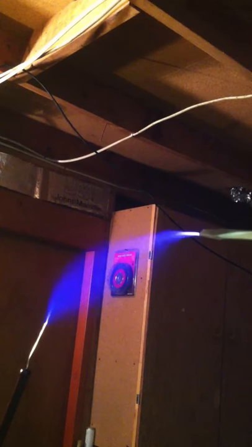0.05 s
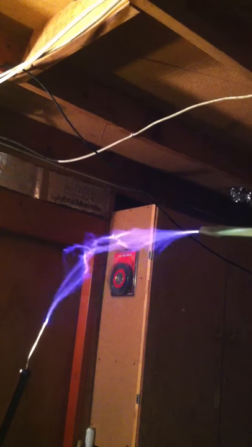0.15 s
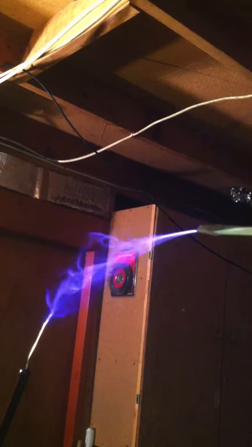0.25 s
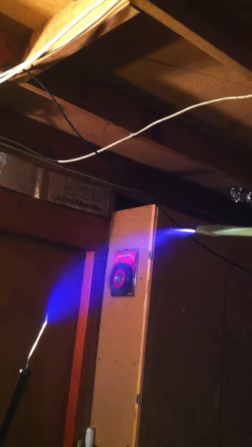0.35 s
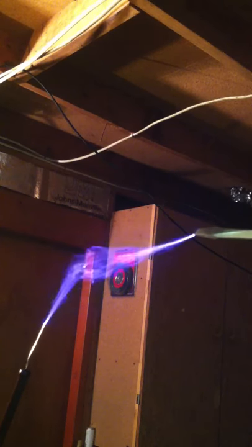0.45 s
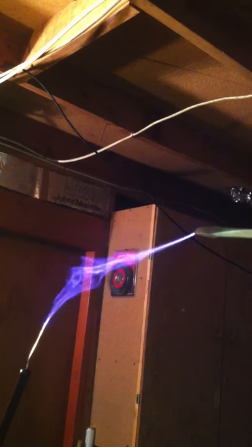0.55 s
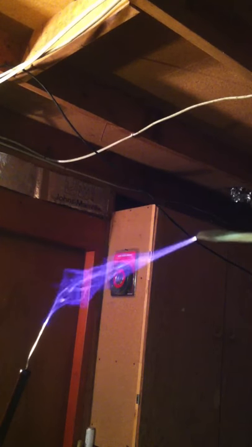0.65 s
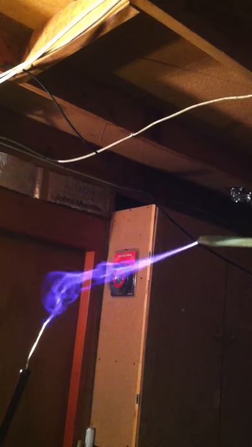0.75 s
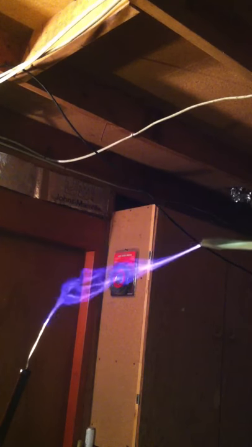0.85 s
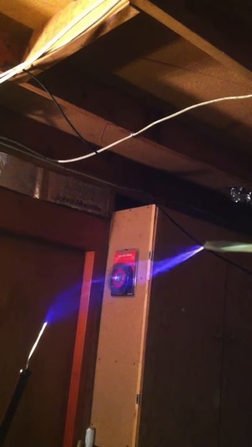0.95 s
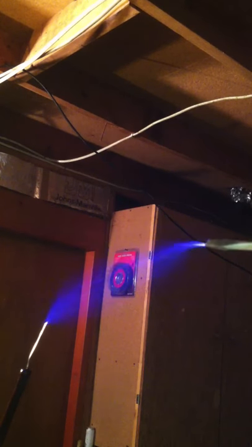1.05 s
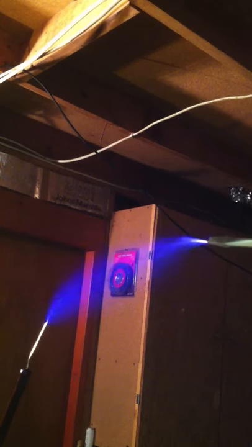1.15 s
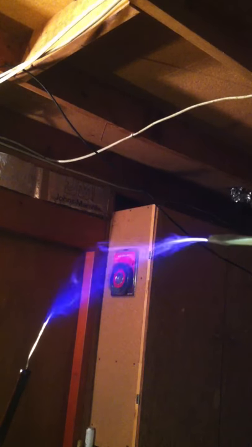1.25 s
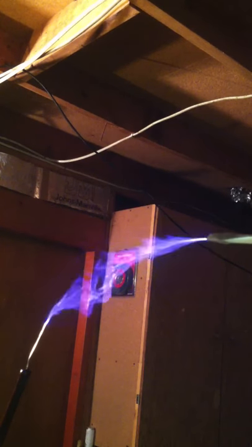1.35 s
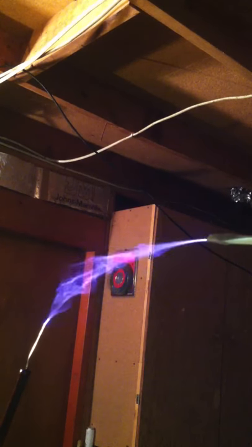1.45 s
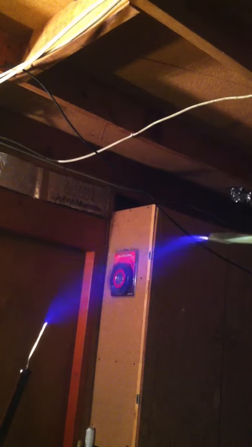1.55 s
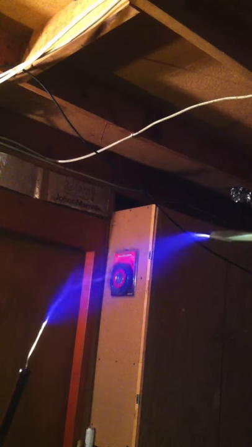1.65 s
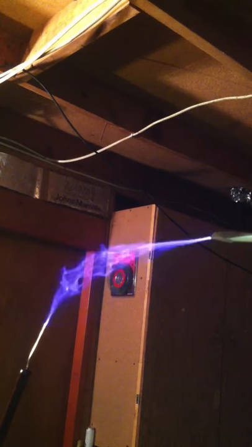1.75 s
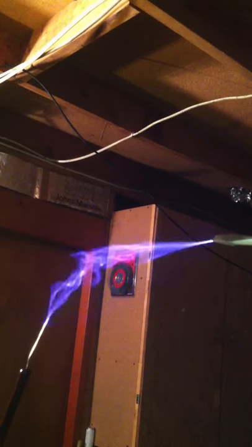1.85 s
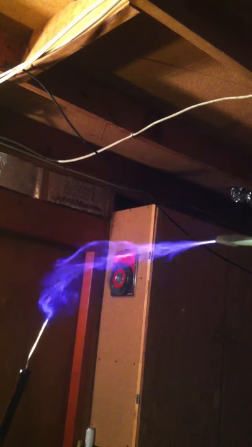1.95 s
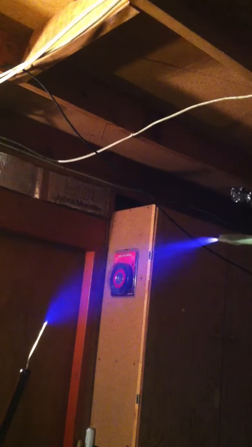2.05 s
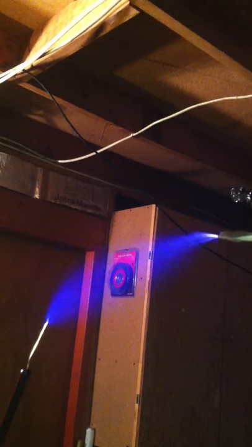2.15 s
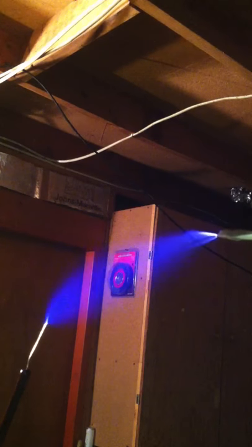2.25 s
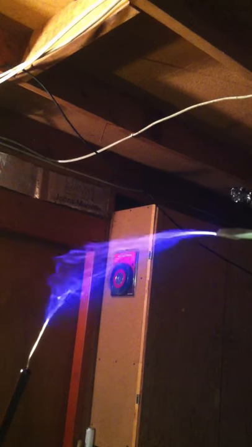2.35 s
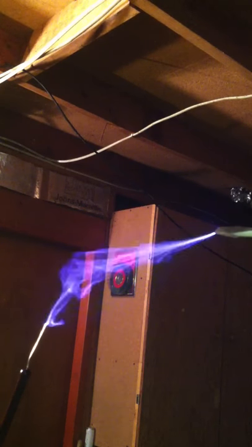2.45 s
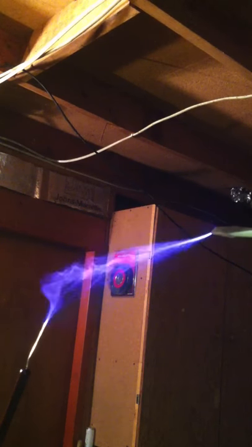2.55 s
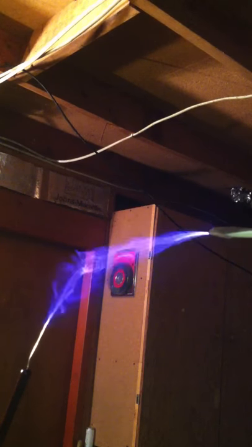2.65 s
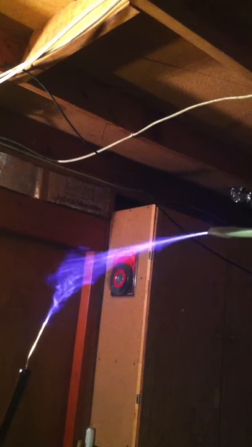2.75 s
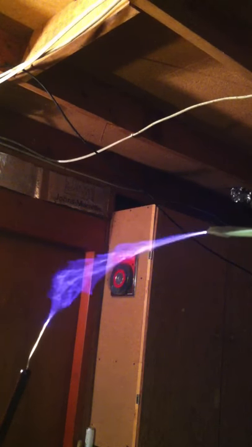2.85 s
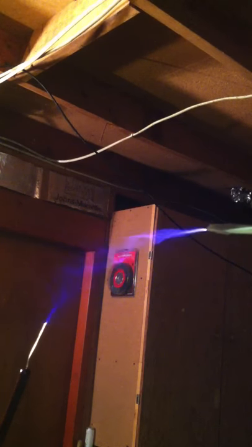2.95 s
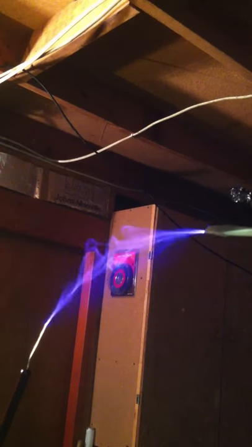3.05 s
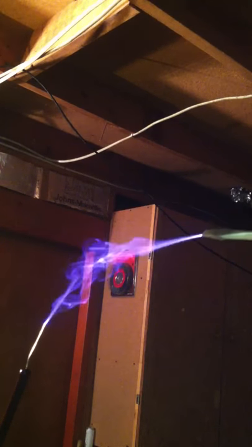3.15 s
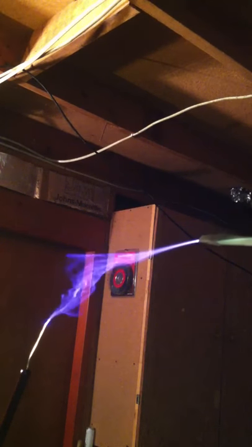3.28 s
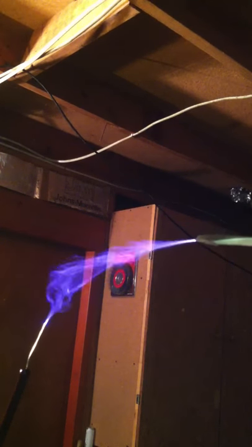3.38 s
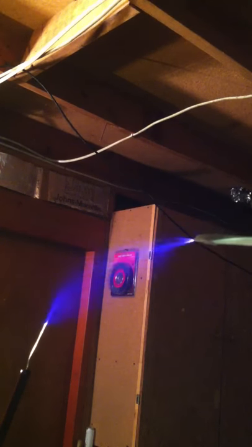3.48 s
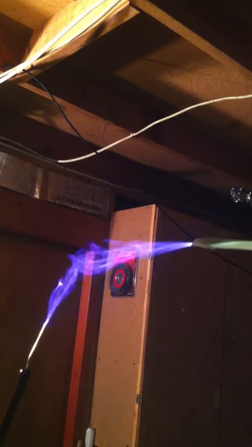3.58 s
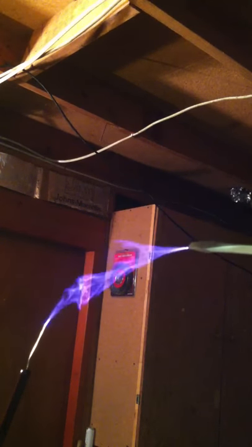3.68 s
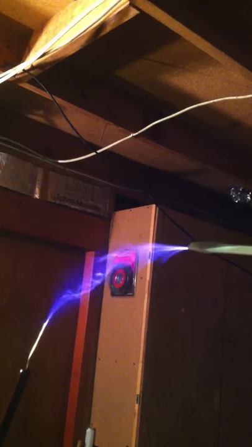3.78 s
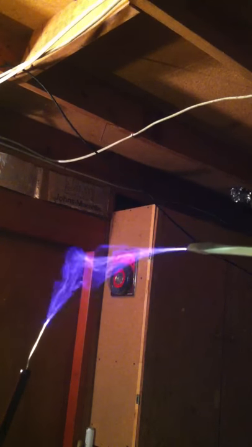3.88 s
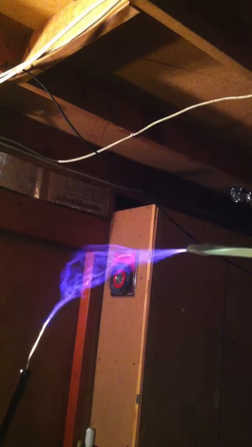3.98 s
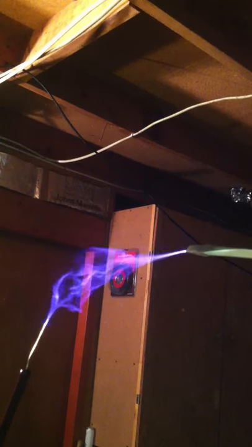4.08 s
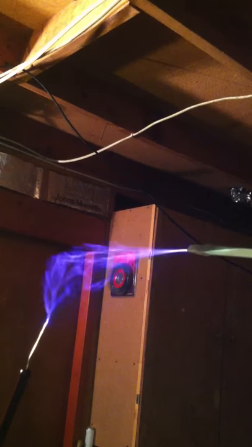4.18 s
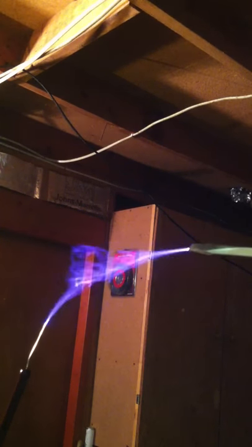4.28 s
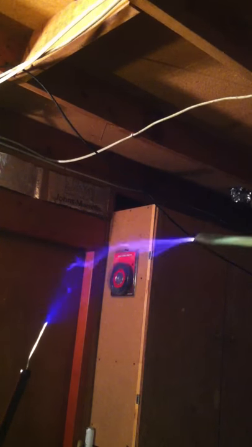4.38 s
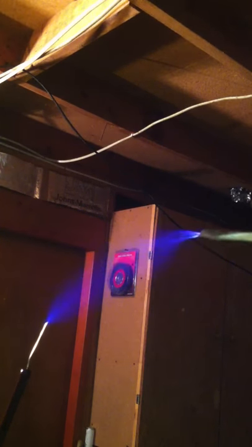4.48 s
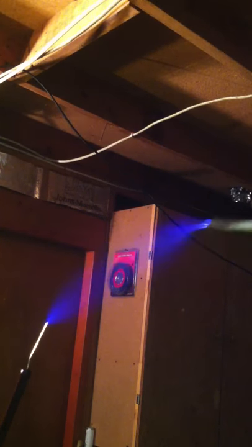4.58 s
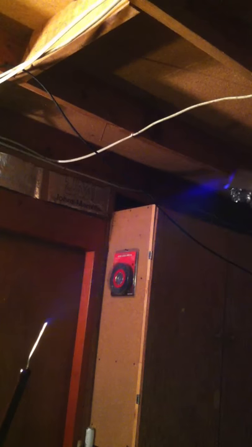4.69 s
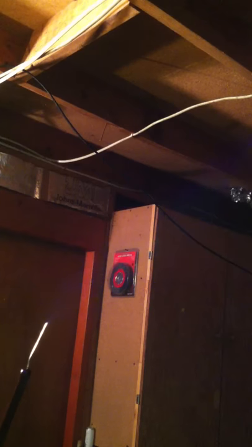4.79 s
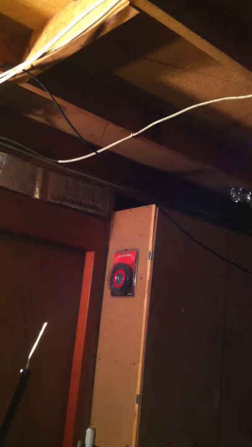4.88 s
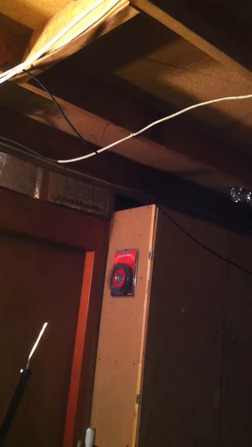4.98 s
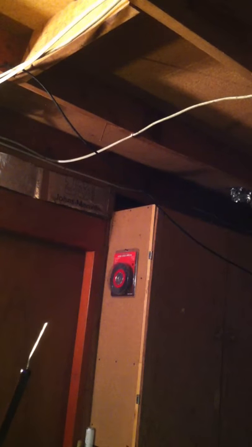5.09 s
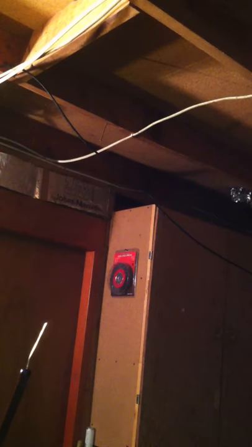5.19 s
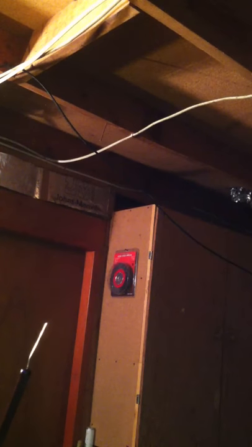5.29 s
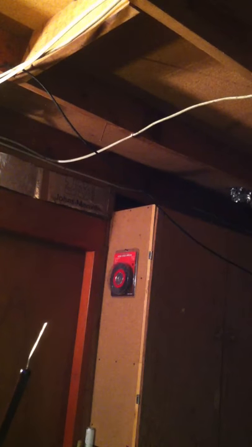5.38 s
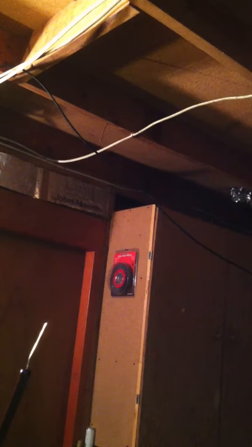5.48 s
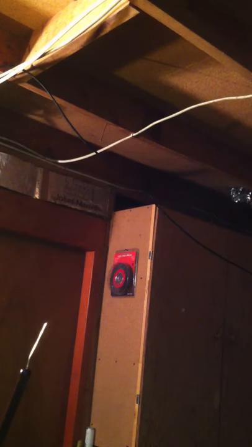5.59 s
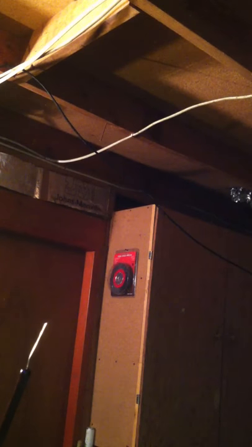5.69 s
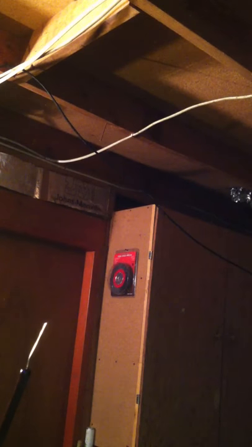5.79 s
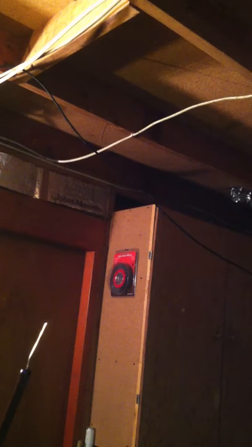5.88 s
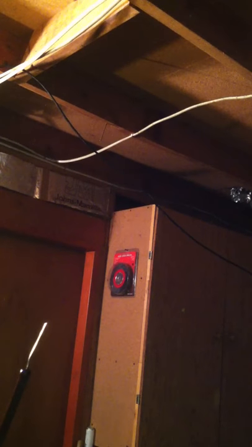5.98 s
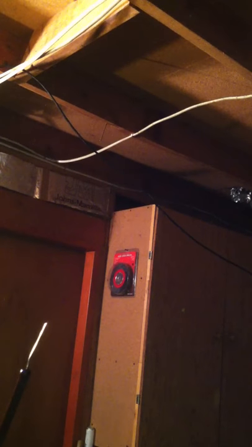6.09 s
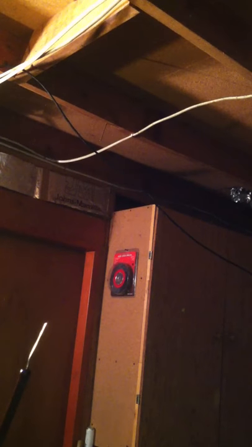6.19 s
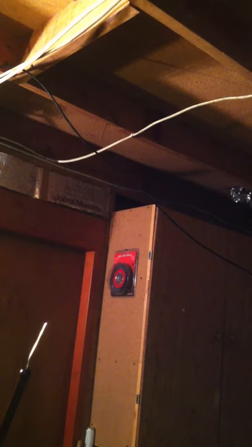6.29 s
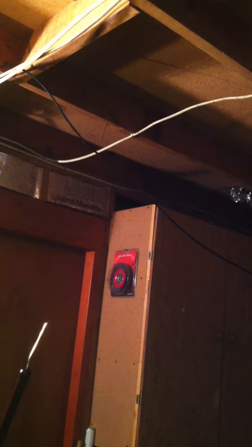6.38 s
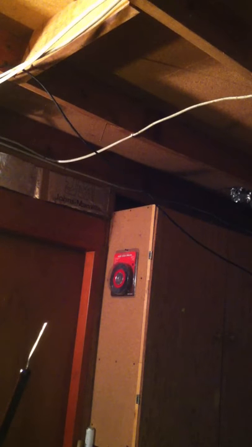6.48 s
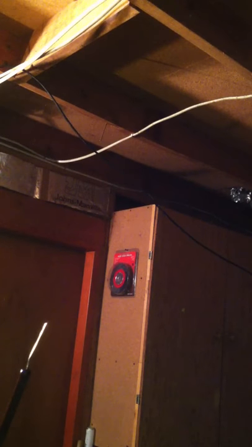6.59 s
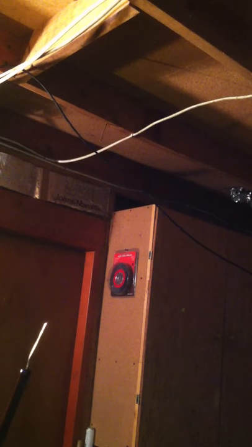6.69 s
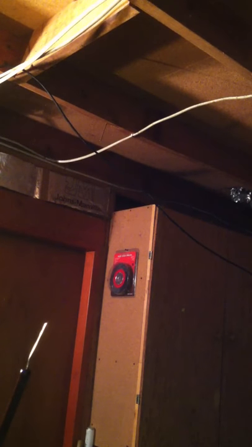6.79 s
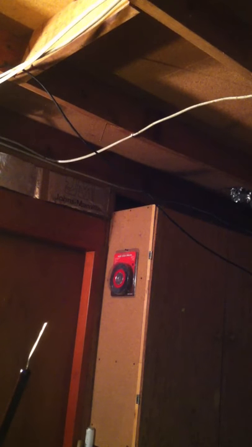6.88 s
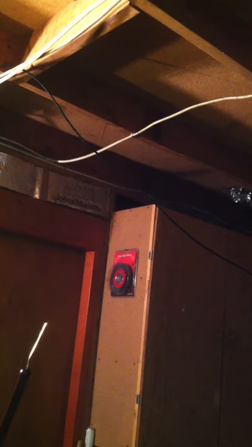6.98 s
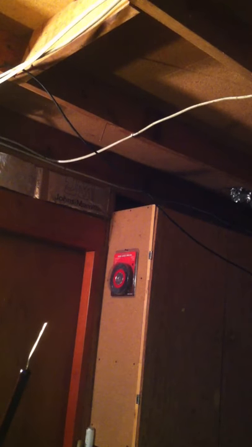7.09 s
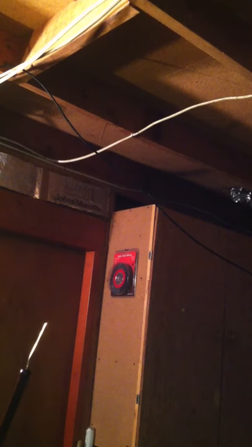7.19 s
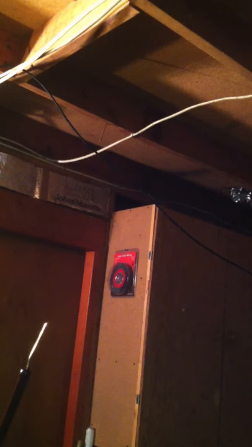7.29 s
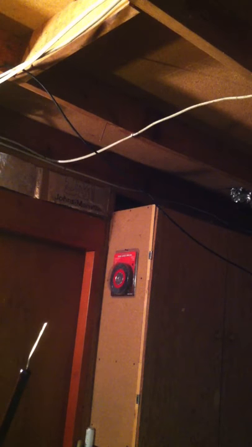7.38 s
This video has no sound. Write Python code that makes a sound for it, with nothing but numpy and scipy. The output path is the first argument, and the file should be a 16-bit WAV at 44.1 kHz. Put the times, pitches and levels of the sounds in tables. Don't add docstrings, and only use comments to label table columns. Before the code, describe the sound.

A hand-held high-voltage arc repeatedly zaps, hisses and tears apart with sharp snaps, burns hardest near the end, pops, and leaves faint humming room air.

```python
import sys
import numpy as np
from scipy import signal
from scipy.fft import rfft, irfft
from scipy.io import wavfile
from scipy.ndimage import uniform_filter1d

SR = 44100
rng = np.random.default_rng(int(sys.argv[2]) if len(sys.argv) > 2 else 0)


def generate_wav(signal):
    frames = np.transpose(np.atleast_2d(signal))
    scaled = np.clip(frames, -1, 1) * 32767
    pcm = np.round(scaled).astype(np.int16)
    wavfile.write(sys.argv[1], SR, pcm)


def how_loud(loudness_db):
    steps = np.asarray(loudness_db, float) / 20
    return 10 ** steps


N = 328104

# multiple_of_turn, level_db
MOTOR_OVERTONES = [(1, -46), (2, -31.5), (3, -22.5), (4, -14), (5, -9), (6, -1), (7, -27), (8, -10.5),
                   (9, -14), (10, 0), (11, -24.5), (12, -7.5), (13, -31.5), (14, -12.5)]
# pitch_hz, rms_db
CORE_LINES = [(840, -71), (908, -74), (1200, -74.5), (1560, -73.5), (1680, -71)]
# frequency_hz, density_db_per_hz
AIR_COLOUR = [(15, -53), (25, -33), (70, -33.5), (212, -8.5), (249, -6.5), (309, -7), (439, -6), (489, -10),
              (531, -10.5), (575, -10.5), (887, -10), (1130, -16.5), (1610, -12.5), (2110, -17.5),
              (16000, -36.5)]
# start_s, level_db, length_ms, first_spark_rate_hz
RESTRIKES = [(0.031, -23.5, 8.9, 9000.0), (0.338, -24.5, 6.3, 9000.0), (0.4005, -26.5, 12, 6560),
             (1.0376, -19.5, 9.7, 4500.0), (1.334, -17, 18, 11060), (1.3938, -18, 8, 9000.0),
             (1.602, -19, 6.2, 3620), (1.8539, -16.5, 16.2, 5510), (2.0627, -16.5, 5.7, 7000.0),
             (2.4835, -18.5, 17, 8040.0), (2.6025, -20.5, 6.3, 2490), (2.697, -20, 8, 4920),
             (2.753, -20, 20.7, 8570), (3.036, -18, 8.9, 8050), (3.542, -22.5, 10.6, 8030),
             (3.885, -19.5, 16.2, 9000.0), (4.2, -24.5, 5.3, 5000.0), (4.2065, -19.5, 5.6, 9000.0),
             (4.3185, -19.5, 16.6, 12000.0), (4.4997, -16.5, 2.9, 6060)]
# start_s, level_db, length_ms
STEADY_SPITS = [(0.1423, -18.5, 3.25), (0.216, -17.5, 4.1), (0.224, -25, 2.95), (0.411, -19, 4.4),
                (1.4392, -15, 1.8), (1.6117, -16.5, 3.1), (1.617, -25, 3.1), (1.7863, -14, 4.4),
                (2.2762, -22, 2.3), (2.4178, -23, 2), (2.432, -22.5, 2.2), (2.5782, -16.5, 3.5),
                (2.597, -25.5, 2.8), (2.713, -17.5, 4.1), (3.1276, -36, 4.2), (3.96, -20.5, 5.7),
                (4.216, -24, 5.1), (4.507, -31, 6.6)]
# frequency_hz, density_db_per_hz
VOLLEY_COLOUR = [(35, -45.5), (60, -19), (1200, 9), (1580, -9), (2050, 1), (3500, -18.5), (4120, 2.5),
                 (4750, -3), (8710, -1.5), (16000, -3.5)]
# start_s, peak_db
LONE_SPARKS = [(0.2797, -18), (0.359, -14), (0.39, -25), (0.5308, -13), (0.6269, -15), (1.2964, -7.5),
               (1.4105, -8), (1.78, -11), (1.824, -17), (1.8253, -18), (1.9288, -8), (2.4633, -14.5),
               (2.527, -6), (2.5513, -22), (2.664, -8), (2.69, -18), (2.7398, -19), (2.776, -10),
               (2.81, -17), (2.8549, -15), (3.1762, -14), (3.1855, -18), (3.2268, -17.5), (3.2653, -17),
               (3.646, -10.5), (3.9902, -25), (3.9969, -17), (4.0092, -19), (4.277, -15), (4.378, -20),
               (0.2624, -28), (0.3213, -19), (0.6047, -31), (0.6917, -26), (0.7095, -25.5), (0.7492, -22),
                (0.7604, -21.5), (0.8615, -26), (0.9547, -28), (1.489, -28), (1.5747, -35), (1.9663, -22),
                (2.0057, -25), (2.0454, -19), (2.9636, -22), (2.9759, -27), (3.0008, -25.5), (3.328, -27),
                (3.3502, -26.5), (3.3995, -30.5), (3.4438, -26), (3.4725, -28), (3.7159, -21),
                (3.8302, -26), (3.8505, -32), (4.0418, -21.5), (4.11, -29), (4.1275, -26.5), (5.3215, -32),
                (5.325, -38.1)]
# start_s, peak_db
GAS_POPS = [(0.314, -48), (0.857, -28), (1.018, -24.5), (2.293, -23), (2.606, -24.5), (2.834, -24),
            (2.868, -24), (3.08, -26.5), (3.161, -27), (3.611, -28.5), (4.512, -39), (4.561, -28),
            (4.576, -20), (4.628, -35), (4.644, -35), (4.66, -34), (4.713, -28)]
# lights_s, lit_hiss_db, tears_s, torn_hiss_db, fade_time_constant_s
ARC_BURNS = [(0.0, -54, 0.011, -50, 0.3), (0.029, -36, 0.18, -33, 0.3), (0.218, -37, 0.23, -38, 0.25),
             (0.339, -34, 0.39, -39, 0.031), (0.401, -34.5, 0.53, -34.5, 0.13),
             (1.037, -41, 1.277, -31.5, 0.037), (1.335, -33.5, 1.48, -38, 0.3),
             (1.394, -31, 1.455, -41.5, 0.088), (1.603, -37.5, 1.82, -33.5, 0.3),
             (1.787, -40, 1.92, -38, 0.3), (1.855, -29, 1.917, -35, 0.15), (2.063, -36, 2.596, -31, 0.017),
             (2.484, -37, 2.54, -35.5, 0.19), (2.595, -31, 2.66, -32.5, 0.05),
             (2.698, -32, 2.81, -33.5, 0.026), (2.753, -30.5, 2.78, -34.5, 0.13),
             (3.037, -42.5, 3.167, -35, 0.13), (3.543, -36.5, 3.603, -36, 0.2),
             (3.885, -33.5, 3.92, -34, 0.2), (4.2, -33.5, 4.25, -36, 0.053), (4.319, -20, 4.175, -19, 0.12),
             (4.5, -47, 4.6, -38, 0.32), (4.83, -52, 4.89, -44, 0.22), (5.318, -63, 5.33, -57, 0.04)]
# restrike_s, hiss_db, lead_s
CORONA_GATHERS = [
    (1.602, -49, 0.043),
    (2.0625, -48, 0.024),
    (3.885, -49, 0.02),
    (4.2, -46, 0.017),
]
# time_s, mains_ripple_db
MAINS_RIPPLE = [(0, 0.5), (1.0, -1), (1.08, 3), (1.29, 2), (1.4, 2), (1.6, -2.5), (1.66, 3.5), (1.8, 1),
                (2.4, 0), (2.55, 3), (2.9, -0.5), (3.08, 3), (3.3, 1.5), (4.28, 1.5), (4.53, 5.5),
                (4.57, 4), (4.71, 2.5), (4.76, 0)]
# frequency_hz, density_db_per_hz
HISS_COLOUR = [(880, -16), (1500, -33), (2040, -0.5), (2740, -7.5), (3250, 0.5), (3660, -2), (9190, -0.5),
               (15100, -3), (16000, -5.5)]
# frequency_hz, density_db_per_hz
ROAR_COLOUR = [(15, -50.5), (25, -45.5), (126, -15), (213, 1), (355, -3), (430, 0), (459, -6.5), (672, -7),
               (747, -8.5), (831, -3), (1100, 1.5), (1570, -2.5), (2030, 0), (2730, -6.5), (4000, -18.5),
               (5200, -8.5), (8800, -120)]
# frequency_hz, gain_db
MICROPHONE = [(1350, 0), (1600, -4.5), (1850, -1), (11000, -0.5), (15780, 2), (15950, -30)]

MAINS_HZ, CREST_TURN = 60, 0.67
MOTOR_HZ, MOTOR_DB, AIR_DB = 43.73, -58.5, -53
ROOM_T60_S, ROOM_DB = 0.39, -10
PARTED_S, PARTING_S = 4.85, 0.17
CORONA_DB, PARTED_DB = -56.5, -71
GLOW_DB, GLOW_S = 9.5, 0.017
ROAR_DB, ROAR_KNEE_DB, ROAR_LAG, PARTED_ROAR_DB = -5.5, -41, 0.56, -12.5
HEATING_HZ, STRIKE_ROUGH = 4500.0, 0.25
SPIT_HZ, SPIT_ROUGH = 9000.0, 0.5
CRACKLE_PER_S, CRACKLE_DB = 35, 14
TICKS_PER_S, TICK_DB, TICK_SPREAD_DB = 45, -33.5, 2.5
LULL_DB = -41
LEAK_START_S, LEAK_END_S, LEAK_DB = 5.02, 5.49, -51
LEAK_SHARE, LEAK_TURN = 0.6, 0.87
THIN_DB = -26.2


def level(x, db):
    return x * how_loud(db) / np.sqrt(np.mean(x ** 2))


def colour(x, points):
    hz, db = np.transpose(points)
    grid = np.maximum(np.fft.rfftfreq(4096, 1 / SR), 1)
    gain_db = np.interp(np.log(grid), np.log(hz), db)
    cepstrum = irfft(np.log(how_loud(gain_db)))
    cepstrum[1:2048] *= 2
    cepstrum[2049:] = 0
    return signal.fftconvolve(x, irfft(np.exp(rfft(cepstrum))))[:N]


def walk(rate):
    hold = int(SR / rate)
    steps = np.repeat(rng.standard_normal(N // hold + 1), hold)[:N]
    return 1.3 * uniform_filter1d(uniform_filter1d(steps, hold), hold)


def add(track, places, sizes):
    whole = np.floor(places).astype(int)
    np.add.at(track, whole, sizes * (1 - places + whole))
    np.add.at(track, whole + 1, sizes * (places - whole))


def sparks(scatter_db):
    sizes = np.minimum(rng.exponential(size=N), 6)
    return level(rng.standard_normal(N) * how_loud(scatter_db * sizes), 0)


def background():
    t = np.arange(N) / SR
    turn = 2 * np.pi * np.cumsum(MOTOR_HZ * (1 + 0.002094 * walk(3))) / SR
    motor = sum(how_loud(db + 1.9 * walk(10)) * np.sin(k * turn + 0.6 * walk(9)) for k, db in MOTOR_OVERTONES)
    core = sum(how_loud(db + 1.5 * walk(4)) * np.sin(2 * np.pi * hz * t) for hz, db in CORE_LINES)
    air = colour(rng.standard_normal(N), AIR_COLOUR) * how_loud(0.77 * walk(3.08))
    air = level(air, AIR_DB - 4)
    air = signal.sosfilt(signal.butter(2, 90, "high", fs=SR, output="sos"), air)
    return np.sqrt(2) * (how_loud(MOTOR_DB) * motor + core) + air


def room(x):
    t = np.arange(SR // 2) / SR
    noise = rng.standard_normal(len(t))
    dull = uniform_filter1d(noise, size=9)
    bright = noise - dull
    tail = dull * how_loud(-60 * t / ROOM_T60_S) + 1.6 * bright * how_loud(-60 * t / (0.54 * ROOM_T60_S))
    tail *= np.clip(t / 0.0055, 0, 1) * how_loud(ROOM_DB) / np.sqrt(np.sum(tail ** 2))
    return x + signal.fftconvolve(x, tail)[:N]


def hiss_level(t):
    burns = np.transpose(ARC_BURNS)
    current = np.searchsorted(burns[0][1:], t)
    lights, first_db, tears, last_db, fade = burns[:, current]
    progress = np.clip((t - lights) / np.maximum(tears - lights, 1e-3), 0, 1)
    drift = first_db + (last_db - first_db) * progress
    drift = drift + GLOW_DB * np.exp(-(t - lights) / GLOW_S)
    corona = np.where(t < PARTED_S, CORONA_DB, PARTED_DB)
    burn_db = corona + (drift - corona) * np.exp(-np.maximum(t - tears, 0) / fade)
    gather = sum(how_loud(db) * np.exp(-np.abs(s - t) / lead) * (t < s) for s, db, lead in CORONA_GATHERS)
    return 20 * np.log10(how_loud(burn_db) + gather)


def volleys():
    restrikes = [(*row, row[-1] + HEATING_HZ, STRIKE_ROUGH) for row in RESTRIKES]
    spits = [(*row, SPIT_HZ, SPIT_HZ, SPIT_ROUGH) for row in STEADY_SPITS]
    return restrikes + spits


def lone_sparks():
    place, draw, size = rng.random((400, 3)).T
    s = place * PARTED_S
    hiss_db = hiss_level(s)
    lull = hiss_db < LULL_DB
    keep = draw * len(s) < np.where(lull, TICKS_PER_S, CRACKLE_PER_S) * PARTED_S
    spread = TICK_SPREAD_DB * (4 * size - 2)
    chance_db = np.where(lull, TICK_DB, hiss_db + CRACKLE_DB) + spread
    leak_s = (np.arange(len(s)) + LEAK_TURN) / MAINS_HZ
    leaks = (leak_s > LEAK_START_S) & (leak_s < LEAK_END_S) & (place < LEAK_SHARE)
    listed_s, listed_db = np.transpose(LONE_SPARKS)
    return (np.concatenate([listed_s, s[keep], leak_s[leaks]]),
            np.concatenate([listed_db, chance_db[keep], LEAK_DB + spread[leaks] / 2]))


def snaps():
    s, db = lone_sparks()
    clicks, thin, pops = np.zeros(N), np.zeros(N), np.zeros(N)
    sizes = how_loud(db) * np.where(db > -14, 1, rng.choice([-1, 1], len(db)))
    add(clicks, s * SR, sizes * (db >= THIN_DB))
    add(thin, s * SR, sizes * (db < THIN_DB))
    first_s, volley_db = np.transpose(volleys())[:2]
    add(clicks, first_s * SR, how_loud(volley_db + 4))
    pop_s, pop_db = np.transpose(GAS_POPS)
    add(pops, pop_s * SR, how_loud(pop_db))
    t = np.arange(200) / SR
    spark = 0.14 * np.exp(-t / 0.00093) * np.cos(2 * np.pi * 1100 * t)
    spark[:4] += [1.94, 0.27, 0.71, -1.57]
    pop = np.sin(2 * np.pi * 1100 * t) * np.exp(-t / 0.00066) * 1.07
    pull = np.exp(-t / 0.0011)
    pop -= pop.sum() * pull / pull.sum()
    full = (signal.fftconvolve(clicks, spark) + signal.fftconvolve(pops, pop))[:N]
    return full + np.convolve(thin, [1.9, -1.1, -0.5], "same")


def puff(heat):
    return signal.sosfilt(signal.butter(2, [55, 220], "band", fs=SR, output="sos"), heat)


def strikes():
    out, heat = np.zeros(N), np.zeros(N)
    for s, db, ms, first_hz, last_hz, rough in volleys():
        jitter, size, swell = rng.standard_normal((3, 2048))
        u = np.arange(int(1.6 * ms * SR / 1000)) * 1000 / SR / ms
        hz = last_hz + (first_hz - last_hz) * 1.2 * np.exp(-u / 0.4)
        wander = np.repeat(jitter, 3)[:len(u)]
        turns = np.cumsum(np.clip(hz * (1 + rough * wander), 800, 16000)) / SR
        count = np.arange(1, int(turns[-1]))
        places = np.interp(count, turns, np.arange(len(u)))
        volley = np.zeros(len(u) + 1)
        add(volley, places, np.exp(1.49 * rough * size[:len(count)]))
        volley = volley[:-1] - 1.04 * uniform_filter1d(volley[:-1], size=24)
        surge = how_loud(2.5 * uniform_filter1d(np.repeat(swell, 40), size=40)[:len(u)])
        attack = np.minimum(u / 0.066, 1) ** 2
        body = 0.51 + 2.9 * u * np.exp(-u / 0.26)
        shape = attack * body * np.exp(-np.maximum(u - 1, 0) / 0.089)
        start = int((s - 0.00006 * ms) * SR)
        out[start:start + len(u)] += level(volley * surge, db) * shape
        heat[start:start + len(u)] += how_loud(db) * shape * surge
    tinted = colour(out, VOLLEY_COLOUR)
    return tinted * np.std(out) / np.std(tinted) * how_loud(1.5) + how_loud(-38.0) * puff(heat)


def burn_curves(t):
    hiss_db = hiss_level(t)
    near = np.clip((PARTED_S - t) / PARTING_S, 0, 1)
    roar_db = ROAR_DB + ROAR_LAG * np.maximum(ROAR_KNEE_DB - hiss_db, 0)
    roar_db = near * roar_db + (1 - near) * PARTED_ROAR_DB
    return hiss_db, roar_db, np.interp(t, *np.transpose(MAINS_RIPPLE))


def burning():
    t = np.arange(N) / SR
    hiss_db, roar_db, ripple_db = burn_curves(t)
    crest = np.exp(1.017 * np.cos(2 * np.pi * (MAINS_HZ * t - CREST_TURN)))
    unrest = np.clip(1 + 0.35 * walk(50), 0, 2)
    pump = np.clip(ripple_db, 0, 5) * (crest - crest.mean()) * unrest
    pump = pump + 1.67 * walk(250)
    hiss = level(colour(sparks(scatter_db=2.5), HISS_COLOUR), 0) * how_loud(0.7 * pump)
    hiss = hiss * how_loud(1.6 * walk(500))
    dull = np.convolve(hiss, [0.25, 0.5, 0.25], "same")
    hiss = dull + (hiss - dull) * how_loud(0.3 * np.clip(hiss_db + 31, -18, 0))
    roar = level(colour(sparks(scatter_db=3.5) * how_loud(1.155 * pump), ROAR_COLOUR), 0)
    flutter = uniform_filter1d(uniform_filter1d(roar, size=120), size=120)
    roar = roar + flutter * (how_loud(2.7 * walk(40) - 7.5) - 1)
    return how_loud(hiss_db) * (hiss + how_loud(roar_db + 1.0) * roar)


def scene():
    return (burning() + room(strikes() + snaps()) + background())[None]


def low_pass(x):
    return signal.sosfilt(signal.butter(12, 16980, fs=SR, output="sos"), x)


def record(dry):
    rounded = 0.8 * np.tanh(dry[0] / 0.82)
    response = how_loud(np.interp(np.fft.rfftfreq(N, 1 / SR), *np.transpose(MICROPHONE)))
    mix = irfft(rfft(rounded) * response, N)
    return low_pass(mix)


dry = scene()
out = record(dry)
generate_wav(out)
```